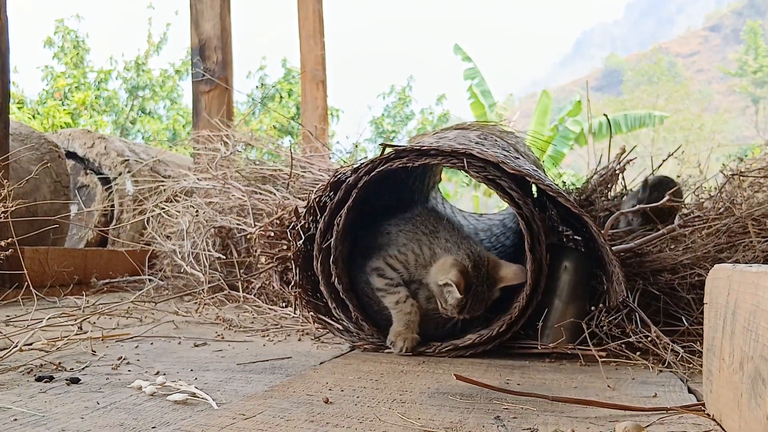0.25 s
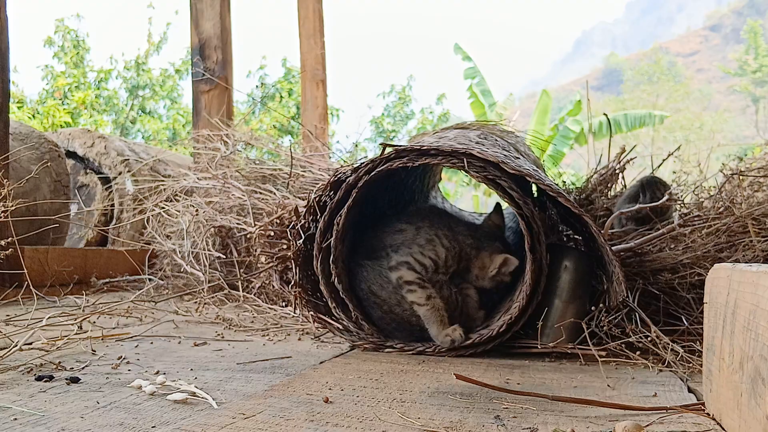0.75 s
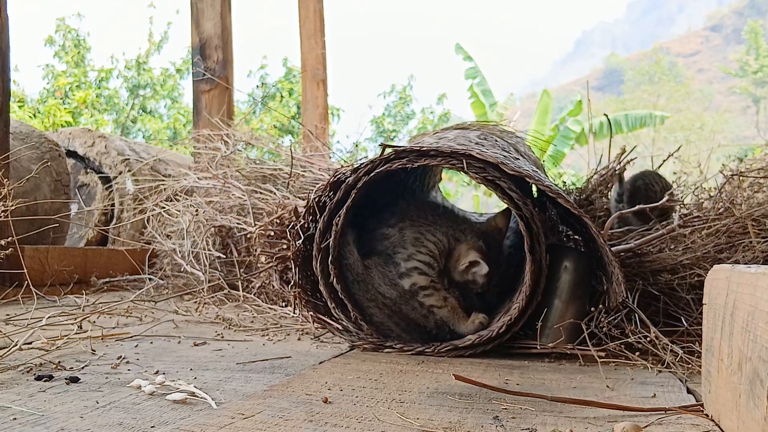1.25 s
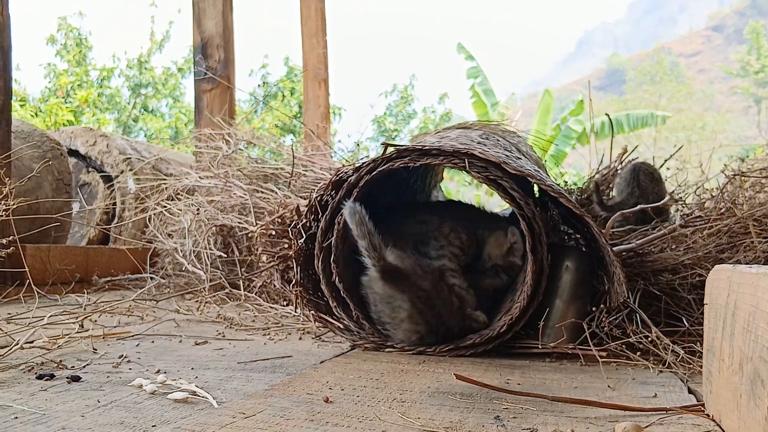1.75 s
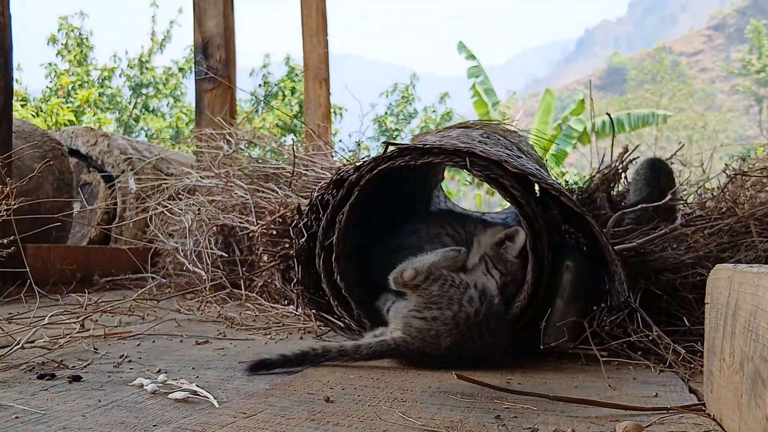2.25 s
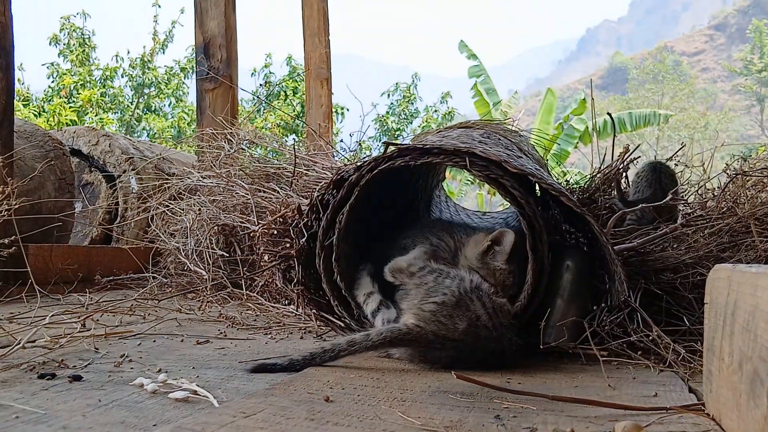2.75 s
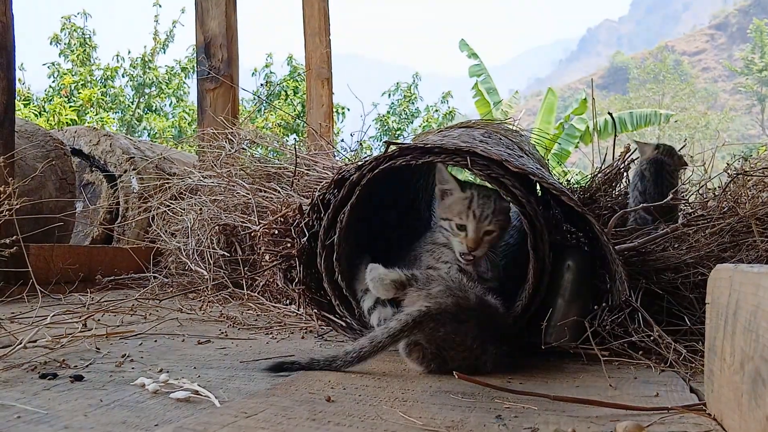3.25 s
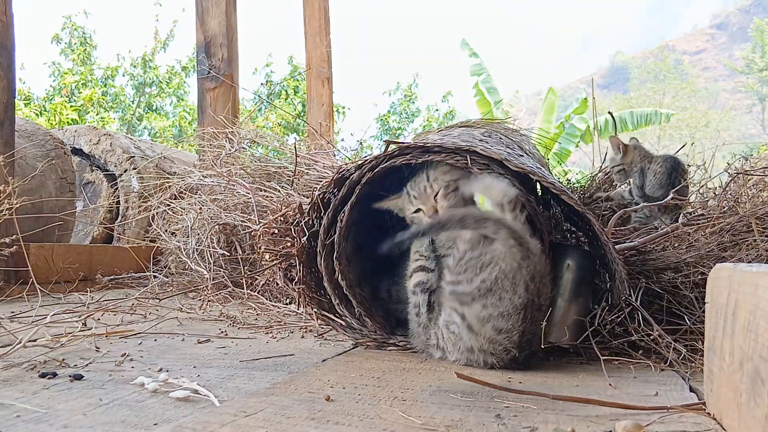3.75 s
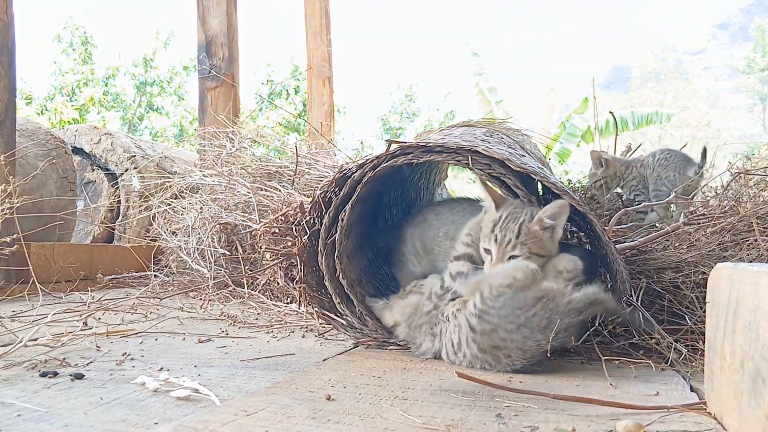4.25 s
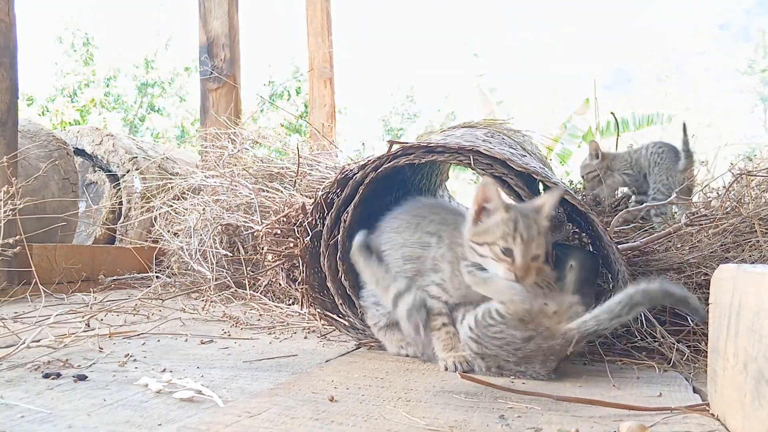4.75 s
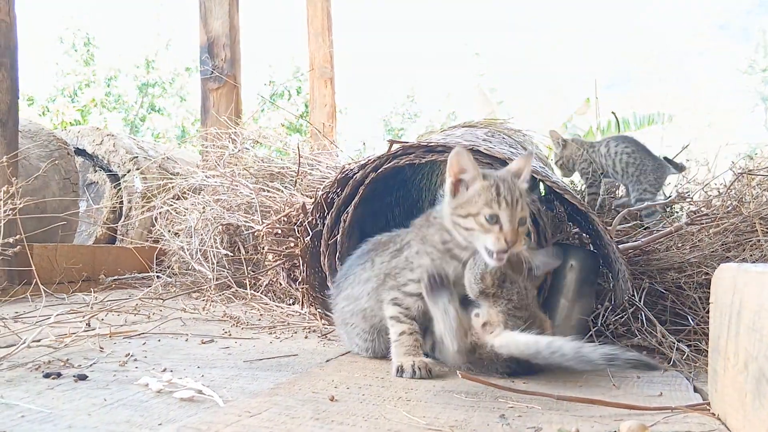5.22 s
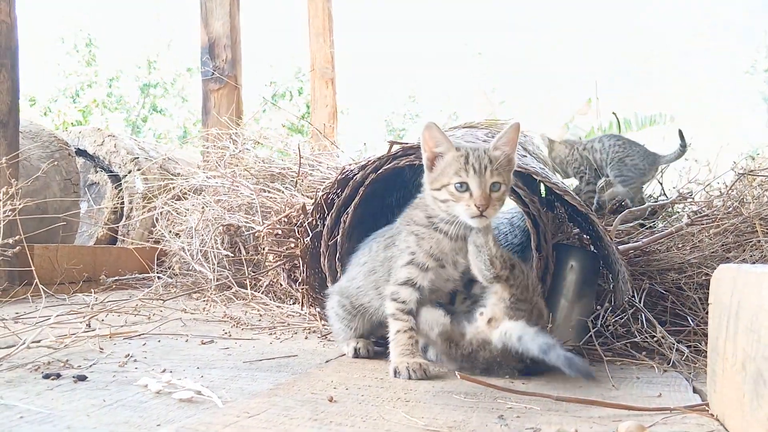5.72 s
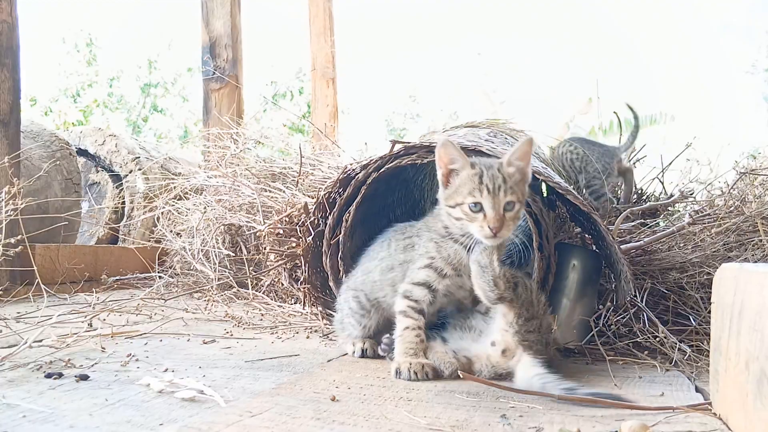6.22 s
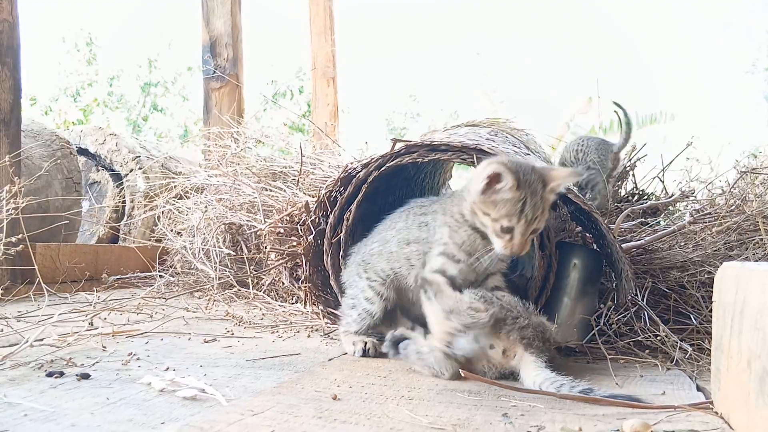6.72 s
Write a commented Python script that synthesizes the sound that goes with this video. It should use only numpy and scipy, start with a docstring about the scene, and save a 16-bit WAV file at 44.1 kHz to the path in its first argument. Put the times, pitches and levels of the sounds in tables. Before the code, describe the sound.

Kittens wrestle in a basket on loft floorboards. After faint far yelps and soft scuffs, a rolling flurry of low thumps comes around one and a half seconds, then shorter bursts with gaps between. Claws tick on wood, straw swishes and snaps lightly. Birds chirp thinly outside. The close microphone picks up the boards heavily on the right.

```python
"""Kittens wrestle in a wicker basket on the plank floor of an open loft strewn with straw.
Each bump swells a bending mode of the boards, which comes up mostly into the right microphone.
Taps are filtered ticks; swishes, scuffs, snaps and rustle are shaped noise.
Outside, birds chirp in falling whistles and a far animal gives three short yelps, over faint air."""
import sys
import numpy as np
from scipy import signal
from scipy.fft import rfft, irfft
from scipy.io import wavfile
from scipy.ndimage import uniform_filter1d

SR = 44100
rng = np.random.default_rng(int(sys.argv[2]) if len(sys.argv) > 2 else 0)


def to_wav(s):
    """Save 16-bit WAV."""
    ch = np.atleast_2d(s).T  # columns
    pcm = np.round(np.clip(ch, -1, 1) * 32767)  # PCM
    wavfile.write(sys.argv[1], SR, pcm.astype(np.int16))


N = 307816
TIME = np.arange(N) / SR


def amp(db):
    """Decibels to gain."""
    return 10 ** (np.asarray(db) / 20)


def evened(x):
    """Scales to rms 1."""
    return x / np.sqrt(np.mean(x ** 2) + 1e-20)


def read(points, hz):
    """Interpolates a spectrum on a log-frequency axis."""
    f, value = np.transpose(points)
    return np.interp(np.log(hz + 1), np.log(f + 1), value)


def panned(left_minus_right_db):
    """Left and right gains for a level difference, rms 1 over the pair."""
    half = np.array([left_minus_right_db, -left_minus_right_db]).reshape(2, -1) / 2
    gains = amp(half)
    return gains / np.sqrt(np.mean(gains ** 2, axis=0))


def freqs(x):
    """FFT bin frequencies of a sound, Hz."""
    return np.fft.rfftfreq(x.shape[-1], 1 / SR)


def shaped(x, gain):
    """Filters by a gain per bin; rms 1."""
    return evened(irfft(rfft(x) * gain, x.shape[-1]))


def noise_pair(size, likeness):
    """White noise at two microphones; likeness is the shared power, 0-1."""
    left, right, shared = rng.standard_normal((3, size))
    likeness = np.clip(likeness, 0, 1)
    return np.sqrt(likeness) * shared + np.sqrt(1 - likeness) * np.array([left, right])


def wander(size, rate_hz):
    """Smooth random motion of rms 1."""
    z = rng.standard_normal(size)
    return shaped(z, 1 / (1 + (freqs(z) / rate_hz) ** 4))


def stroke(t, rise_s, t60_s, hold_s=0):
    """Linear rise, hold, exponential fall."""
    falling_s = np.maximum(t - rise_s - hold_s, 0)
    return np.minimum(t / rise_s, 1) * amp(-60 * falling_s / t60_s)


def add(mix, start_s, sound):
    """Mixes a sound in at a time."""
    part = mix[..., max(round(start_s * SR), 0):][..., :sound.shape[-1]]
    part += sound[..., :part.shape[-1]]


# decay of the loft's echoes: f/Hz, t60/s
LOFT_DECAY = [(100, 0.18), (700, 0.17), (4000, 0.14), (12000, 0.058)]


def loft(x):
    """Sparse scattered echoes from roof and planks, different at each microphone; highs die sooner."""
    size = (2, SR // 2)
    echoes = rng.standard_normal(size) * (rng.random(size) < .1)
    hz, t, z = signal.stft(echoes, SR, nperseg=256)
    decay = amp(-60 * t / read(LOFT_DECAY, hz)[:, None]) * (t > .004)
    tail = signal.istft(z * decay, SR, nperseg=256)[1]
    tail /= np.linalg.norm(tail[0])
    return signal.fftconvolve(np.atleast_2d(x), tail, axes=1)[:, :N]


# bodies and paws bump the boards: peak t/s, relative level/dB, swell/s
BUMPS = [(.461, -48.5, .04), (0.669, -48.5, 0.02), (1.097, -37.5, 0.0057), (1.275, -33, 0.041),
         (1.322, -28.5, 0.013), (1.358, -23.5, .01), (1.409, -19.5, 0.011), (1.45, -21.5, 0.011),
         (1.491, -18.5, 0.011), (1.525, -19, 0.012), (1.614, -40, 0.0054), (1.689, -29, .007),
         (1.717, -26, 0.0063), (1.768, -23, 0.00704), (2.458, -37, 0.0068), (2.492, -23, 0.0077),
         (2.513, -26, 0.0114), (3.115, -37, 0.0072), (3.181, -40.5, 0.039), (3.434, -22, .02),
         (4.468, -33.5, .014), (4.505, -27.5, .008), (4.561, -18.5, 0.024), (4.599, -21, 0.0086),
         (5.112, -45.5, 0.0073), (5.342, -47, 0.023), (5.673, -29.5, 0.026), (5.725, -22, 0.016),
         (5.763, -19, 0.009), (5.807, -23, 0.006), (5.961, -24, 0.0089), (6.014, -22, 0.017),
         (6.593, -39, 0.011), (6.676, -22, 0.018), (6.843, -24, .005), (6.914, -35.5, 0.014)]
PLANK_T60_S = 0.12


def bump_power(paw_db=-54, paw_swell_s=0.005, count=14):
    """Power of plank motion: bumps swell and ring out, with light paw steps at random in between."""
    paws = [((k + when) / count * N / SR, paw_db, paw_swell_s)
            for k, when in enumerate(rng.random(count))]
    power = np.zeros(N)
    t = np.arange(-SR // 4, SR // 4) / SR
    ringing_s = np.hypot(np.maximum(t, 0), .008) - .008  # rounds the top
    fall = amp(-60 * ringing_s / PLANK_T60_S)
    for peak_s, db, swell_s in list(BUMPS) + paws:
        rise = np.exp(-(np.minimum(t, 0) / swell_s) ** 2 / 2)
        add(power, peak_s + t[0], (amp(db) * rise * fall) ** 2)
    return power


# plank response to jolts and blows: f/Hz, gain/dB
PLANK_JOLT = [(60, -12.5), (130, 2.5), (200, -4), (300, -16.5), (480, -18.5), (750, -29.5), (1400, -38),
              (2500, -40.5), (6000, -81)]
# colour of the floor's trembling: f/Hz, level/dB
TREMOR = [(20, -37), (45, -18), (65, 5), (82, -1), (105, -10.5), (150, -24.5), (300, -19.5), (600, -58)]
PLANK_HZ, PLANK_SWAY = 85.3, 0.1375  # bending mode; rms sway as a share of its pitch
BLOW_S, BLOW_LEAD = 0.0022, 1.455  # contact length; lead before the peak, in swell times


def boards(jolt_db=-20, jolts_per_s=170, blow_db=10.0, boom_db=-3, tremor_db=-60, follow=0.15):
    """Dull blows, then a swaying bending mode; small jolts ride on it while the weight shifts."""
    power = bump_power()
    pitch_hz = PLANK_HZ * (1 + PLANK_SWAY * wander(N, 45.6))
    boom = np.sqrt(2) * np.sin(2 * np.pi * np.cumsum(pitch_hz) / SR)
    slips = (rng.random(N) < jolts_per_s / SR) * rng.choice([-1, 1], N)
    slips = slips + 0.0057 * rng.standard_normal(N)
    hz = freqs(slips)
    wood = amp(read(PLANK_JOLT, hz))
    blows = np.zeros(N)
    contact = np.hanning(round(BLOW_S * SR))
    for peak_s, db, swell_s in BUMPS:
        add(blows, peak_s - BLOW_LEAD * swell_s, amp(db + blow_db) * BLOW_S / swell_s * contact)
    ringing = amp(boom_db) * boom + amp(jolt_db) * shaped(slips, wood)
    bumps = np.sqrt(power) * ringing + irfft(rfft(blows) * wood, N)
    # the floor trembles throughout, a little more around the bumps
    unrest = evened((abs(uniform_filter1d(power, SR // 2)) + 1e-7) ** (follow / 2))
    tremor = amp(tremor_db) * unrest * shaped(noise_pair(N, 0.43), amp(read(TREMOR, hz)))
    return bumps * amp([[-36], [0]]) + tremor * amp([[-11], [0]])  # left, right


# claws and cane tap the planks: t/s, peak level/dB, brightness f/Hz, left minus right/dB
TAPS = [(1.3602, -26, 1490, -24), (1.363, -24.5, 1660, -27), (2.497, -31, 1210, -35),
        (3.428, -33.5, 1120, -31), (5.041, -34, 1000, 2), (5.807, -31.5, 1600, -37),
        (5.81, -22.5, 1690, -35), (5.822, -27, 3320, -26), (6.828, -34, 1400, -21), (6.832, -31, 1500, -19),
        (6.835, -27, 1020, -26)]
# colour of a tap: f/Hz, gain/dB
TAP_WOOD = [(80, 16.5), (200, 15.5), (480, 0.5), (800, 2), (1000, -2.5), (1400, -2.5), (2000, -10),
            (3000, 0), (5000, -9), (9000, -63)]


def taps(ring_db=-7, ring_t60_s=0.11, room_db=-19):
    """A hard tick plus a brief noisy wood ring, low-passed at its own brightness, with loft echoes."""
    out, t = np.zeros((2, N)), np.arange(4096) / SR
    lead = len(t) // 16  # room for the filter's pre-ring
    for start_s, db, bright_hz, side_db in TAPS:
        blow = rng.standard_normal(len(t)) * amp(-60 * t / ring_t60_s)
        blow *= amp(ring_db) / np.linalg.norm(blow)
        blow[0] += 1
        hz = freqs(blow)
        colour = amp(read(TAP_WOOD, hz)) / np.sqrt(1 + (hz / bright_hz) ** 5)
        tick = irfft(rfft(np.roll(blow, lead)) * colour)
        add(out, start_s - lead / SR, amp(db) * tick / abs(tick).max() * panned(side_db))
    return out + amp(room_db) * loft(out)


# pounces and sweeps: t/s, level/dB, t60/s, brightness f/Hz, share of cane ringing/0-1
SWISHES = [(.49, -60.5, 0.42, 1170, 0), (1.26, -50.5, 0.42, 2270, 0.24), (1.4, -58, 0.84, 1400, 0.34),
           (1.914, -53, 0.23, 3080, 0), (2.1, -62, 0.84, 1500, 0.4), (2.159, -51, 0.19, 1990, 0),
           (3.085, -65, 0.41, 3000, 0.6), (3.897, -66.5, 0.15, 2980, 0), (4.181, -44.5, 0.25, 5400, 0.63),
           (6.357, -64.5, 0.21, 5030, 1)]
# hollow scuffs and soft landings: t/s, level/dB, resonance f/Hz, t60/s
SCUFFS = [(.1, -72, 440, 0.48), (.347, -62, 260, 0.3), (0.487, -56, 230, 0.25), (.65, -66, 560, 0.3),
          (1.276, -48, 460, 0.27), (1.395, -57, 720, 0.53), (1.92, -59.5, 199, 1.2),
          (1.993, -62.5, 764, 0.39), (2.165, -54.5, 242, 0.26), (3.46, -59, 710, 0.67),
          (3.85, -69.5, 940, 1.3), (5.035, -46, 127, 0.48), (5.037, -50, 567, 0.13),
          (6.832, -48.5, 654, 0.096)]
# dry stalks snap: t/s, level/dB, ring f/Hz
SNAPS = [(2.378, -62, 11400), (2.578, -59, 9600), (3.848, -52.5, 13200), (6.645, -60.5, 11900)]
# colour of swept straw: f/Hz, gain/dB
STRAW = [(70, -29), (200, -4.5), (500, 4.5), (800, 4), (1050, -2), (1450, 1.5), (2100, -7.5), (3000, -3.5),
         (4500, 0), (7000, -10), (11000, -7), (16000, -13)]
# stereo balance of straw: f/Hz, left minus right/dB
STRAW_SIDE = [(100, -2), (700, -7), (1500, 2.5), (4400, -2.5), (8000, 21), (14000, -5.5)]
# wicker basket resonances: f/Hz, width/Hz, gain/dB
CANE = [(1073, 39, 14), (1560, 63, 3), (2030, 160, 13.5), (2510, 150, 14), (2910, 81, 15), (3210, 170, 6),
        (3770, 150, 3.5), (4600, 110, -1), (5660, 770, -5), (11300, 150, 10.5)]
SWISH_RISE, SCUFF_RISE = .02, 0.02  # share of t60: long strokes also start softly
SWISH_HOLD_S = 0.028  # a paw keeps sweeping before the stalks settle


def straw(grain_db=3, clump_db=-2.5, scuff_q=3.5, snap_q=7, snap_rise_s=0.0075, snap_t60_s=0.19):
    """Grainy noise of many stalks rings the cane; hollow scuffs and snaps are resonant noise strokes."""
    out, t = np.zeros((2, N)), np.arange(SR // 2) / SR
    hz = freqs(t) + 1
    colour = amp(read(STRAW, hz)) * panned(read(STRAW_SIDE, hz))
    cane = sum(amp(db) / (1 + (2 * (hz - f) / width_hz) ** 2) for f, width_hz, db in CANE)
    for start_s, db, t60_s, bright_hz, ring in SWISHES:
        grain = amp(grain_db * wander(len(t), 670) + clump_db * wander(len(t), 95))
        stalks = noise_pair(len(t), 0.06) * grain
        gain = colour * (1 + ring * cane) / np.hypot(1, hz / bright_hz)
        envelope = stroke(t, SWISH_RISE * t60_s, t60_s, SWISH_HOLD_S)
        add(out, start_s, amp(db) * envelope * shaped(stalks, gain))
    for start_s, db, ring_hz, t60_s in SCUFFS:
        body = 1 / (1 + (scuff_q * np.log(hz / ring_hz)) ** 2)
        envelope = stroke(t, SCUFF_RISE * t60_s, t60_s)
        add(out, start_s, amp(db) * envelope * shaped(noise_pair(len(t), 0.85), body))
    for start_s, db, ring_hz in SNAPS:
        stalk = 1 / np.hypot(1, snap_q * np.log(hz / ring_hz))
        snap = stroke(t, snap_rise_s, snap_t60_s) * shaped(noise_pair(len(t), 0.068), stalk)
        add(out, start_s, amp(db) * snap * panned(8.4))
    return out


# fur brushes dry stalks: t/s, level/dB
RUSTLE = [(0, -71.5), (.95, -82.5), (1.5, -70.5), (2.4, -69.5), (2.7, -87), (3.16, -67), (3.3, -79),
          (3.62, -80.5), (3.88, -67.5), (4.35, -73.5), (6.24, -71), (6.5, -75), (6.98, -67.5)]
# colour of the stalks: f/Hz, gain/dB
STALKS = [(900, -4.5), (2000, -2), (3500, 4.5), (6500, -1.5), (9000, 1), (13000, 3.5), (16000, -11)]


def rustle(shaken_db=-50, grain_db=4, clump_db=2):
    """Fine crackle of stalks in small clumps: fur brushes them and the bumps shake them."""
    t_s, db = np.transpose(RUSTLE)
    brushed = amp(np.interp(TIME, t_s, db))
    shaken = amp(shaken_db) * np.sqrt(abs(uniform_filter1d(bump_power(), SR // 8)))
    grains = noise_pair(N, 0.12) * amp(grain_db * wander(N, 1400) + clump_db * wander(N, 23))
    hz = freqs(TIME)
    colour = amp(read(STALKS, hz)) * panned(read(STRAW_SIDE, hz))
    return np.hypot(brushed, shaken) * shaped(grains, colour)


CHIRP_S, CHIRP_FALL_HZ_PER_S = .1, 15000  # length; nominal fall of the nearer birds


def chirp(mid_hz, fall_hz_per_s, waver=0.0087, flutter_db=4.0):
    """One thin falling whistle that flutters on its way through the foliage."""
    t = np.arange(-CHIRP_S / 2, CHIRP_S / 2, 1 / SR)
    hz = (mid_hz - fall_hz_per_s * t) * (1 + waver * wander(SR // 4, 220)[:len(t)])
    flutter = amp(flutter_db * wander(SR // 4, 56)[:len(t)])
    return flutter * signal.windows.tukey(len(t), .7) * np.sin(2 * np.pi * np.cumsum(hz) / SR)


# nearer birds: middle t/s, pitch there f/Hz, relative level/dB
CHIRPS = [(.27, 4260, -66.5), (.426, 4730, -66), (.48, 3940, -58.5), (.572, 3880, -68), (.7, 4210, -72),
          (.81, 3940, -72.5), (1.11, 3730, -66), (1.239, 4070, -67), (1.457, 4050, -65), (1.594, 4080, -65),
          (2.435, 4130, -65), (2.51, 3645, -61.5), (2.807, 4235, -67), (3.119, 3890, -67),
          (3.178, 3830, -61), (3.33, 3770, -64), (3.492, 4010, -60), (3.658, 4090, -64.5),
          (3.851, 4180, -67), (3.911, 3980, -64.5), (4.033, 3950, -69), (4.39, 4020, -69),
          (4.489, 4000, -65), (4.571, 3570, -64), (4.793, 4030, -64), (4.948, 4030, -66),
          (5.017, 4830, -76), (5.082, 4050, -66), (5.136, 4050, -62.5), (5.69, 4050, -71),
          (5.9, 4070, -67.5), (6.16, 4080, -65.5), (6.411, 3950, -67), (6.669, 4130, -70)]
FLOCK_HZ, FLOCK_SPREAD_HZ, FLOCK_DB = 3820, 1300, -76  # farther birds; full spread


def birds(direct_db=-1.9, echo_db=-5.5, slur_spread=.1, count=50):
    """A few nearer birds over a fainter flock with flatter slurs, heard only as loft echoes."""
    near, flock = np.zeros((2, N))
    for mid_s, hz, db in CHIRPS:
        fall = CHIRP_FALL_HZ_PER_S * (1 + slur_spread * rng.uniform(-1.064, 1))
        add(near, mid_s - CHIRP_S / 2, amp(db) * chirp(hz, fall))
    for k, (when, pitch, slur) in enumerate(rng.random((count, 3))):
        hz = FLOCK_HZ + FLOCK_SPREAD_HZ * (pitch - .5)
        call = chirp(hz, CHIRP_FALL_HZ_PER_S * slur)
        add(flock, (k + when) / count * N / SR, amp(FLOCK_DB) * call)
    direct = np.array([near, np.roll(near, 3)])  # right 3 samples late
    return amp(direct_db) * direct + loft(amp(echo_db) * near + flock)


# far animal: t/s, length/s, top f/Hz, place of the top/0-1, relative level/dB
YELPS = [(0.174, .062, 871, 0.51, -52), (0.795, 0.022, 744, 0.6, -60), (0.839, 0.024, 844, 0.34, -52.5)]
YELP_LOW_HZ = 469  # start and end of each pitch arch


def yelps(rough=0.069, overtone_db=-27, direct_db=-1, echo_db=-10):
    """A small, slightly hoarse voice far off to the right; each yelp is one arch of pitch."""
    out = np.zeros(N)
    for start_s, length_s, top_hz, top_at, db in YELPS:
        u = np.linspace(0, 1, round(length_s * SR))
        arch = np.sin(np.pi * np.interp(u, [0, top_at, 1], [0, .5, 1]))
        hoarse = 1 + rough * wander(SR // 4, 210)[:len(u)]
        hz = (YELP_LOW_HZ + (top_hz - YELP_LOW_HZ) * arch) * hoarse
        phase = 2 * np.pi * np.cumsum(hz) / SR
        voice = np.sin(phase) + amp(overtone_db) * np.sin(2 * phase)
        add(out, start_s, np.sqrt(2) * amp(db) * voice * signal.windows.tukey(len(u), .3))
    direct = np.array([np.roll(out, 15), out])  # left 15 samples late
    return (amp(direct_db) * direct + amp(echo_db) * loft(out)) * panned(-5.5)


# valley ambience and microphone hiss: f/Hz, relative level/dB
AIR = [(30, -45), (130, -6), (350, -14), (600, -12), (1000, -14), (1550, -16), (1800, -19.5), (2300, -21.5),
       (3000, -18.5), (4100, -19), (5000, -25.5), (6800, -40.5), (9000, -29.5), (12000, -20.5),
       (16000, -20.5)]
# stereo balance of the air: f/Hz, left minus right/dB
AIR_SIDE = [(150, -9), (400, -7), (1500, -6), (4000, -5.5), (8000, 2.5), (14000, -0.5)]
# swell of the valley ambience: t/s, gain/dB
AIR_SWELL = [(0, 3.5), (1, -1), (2.1, 0.5), (3.8, 4), (4.8, 0), (6.2, 1), (6.98, 6)]
AIR_DB = -65  # rms before the swell


def air(ripple_db=3.0, patch_db=-1.5):
    """Faint valley ambience that swells slowly, coloured by the loft, under steady microphone hiss."""
    hz = freqs(TIME)
    ripple = ripple_db * wander(len(hz), 42)  # random over frequency
    colour = amp(read(AIR, hz) + ripple) * panned(read(AIR_SIDE, hz))
    bed = amp(AIR_DB) * shaped(noise_pair(N, 0.11), colour)
    valley = irfft(rfft(bed) / (1 + (hz / 2500) ** 4), N)
    t_s, db = np.transpose(AIR_SWELL)
    swell = amp(np.interp(TIME, t_s, db) + patch_db * wander(N, 24))
    return bed + valley * (swell - 1)  # only the valley part swells


def scene():
    """The kittens close by, the outdoors behind."""
    return boards() + taps() + straw() + rustle() + birds() + yelps() + air()


def record(dry, low_cut_hz=42, edge_hz=15800):
    """The recorder's bass cut and band limit."""
    bass_cut = np.hypot(1, (low_cut_hz / (freqs(dry) + 1)) ** 4)
    trimmed = irfft(rfft(dry) / bass_cut, N)
    band_limit = signal.firwin(511, edge_hz, window=("kaiser", 9), fs=SR)
    return signal.oaconvolve(trimmed, band_limit[None], "same")


dry = scene()
out = record(dry)
to_wav(out)
```